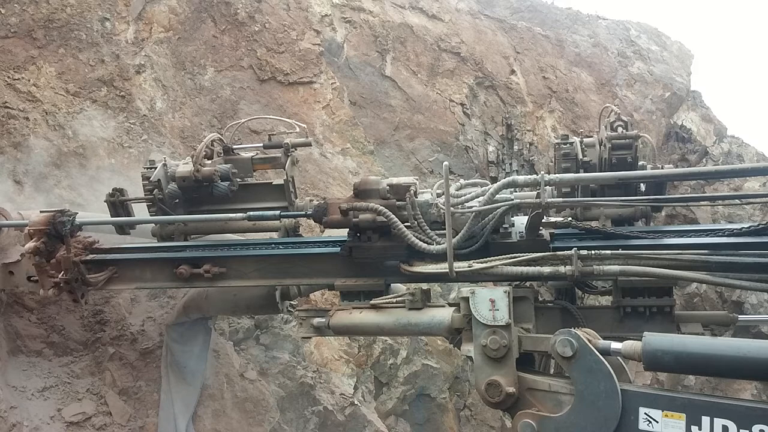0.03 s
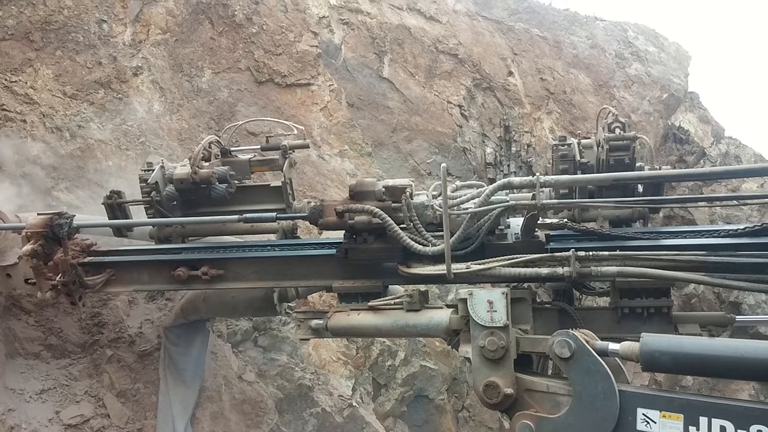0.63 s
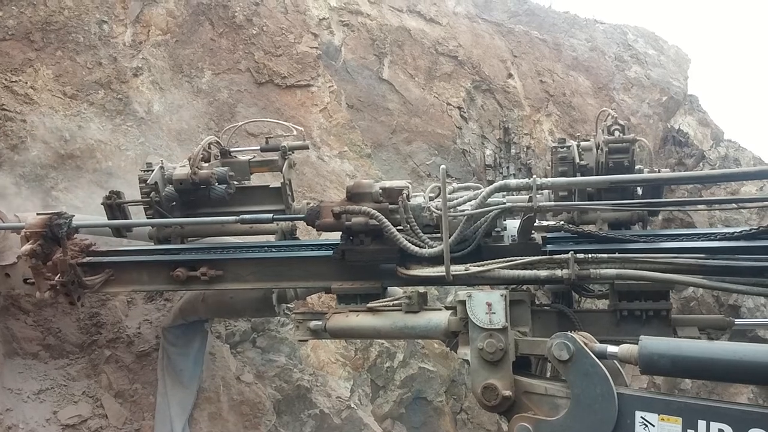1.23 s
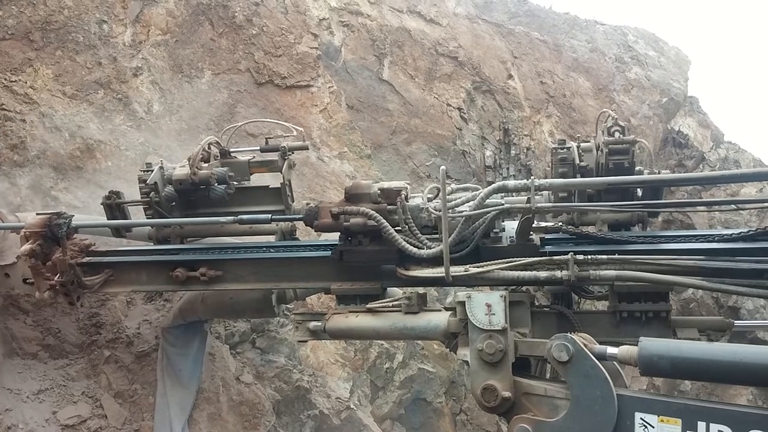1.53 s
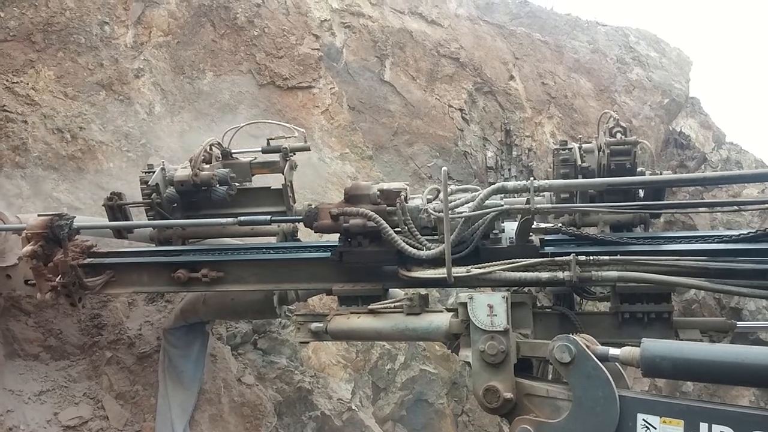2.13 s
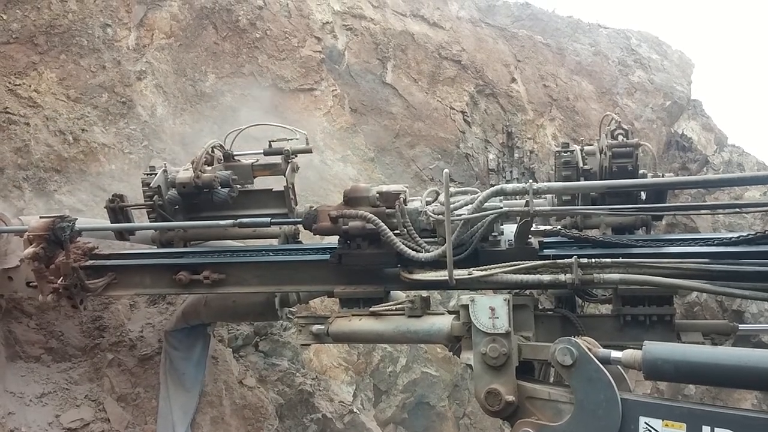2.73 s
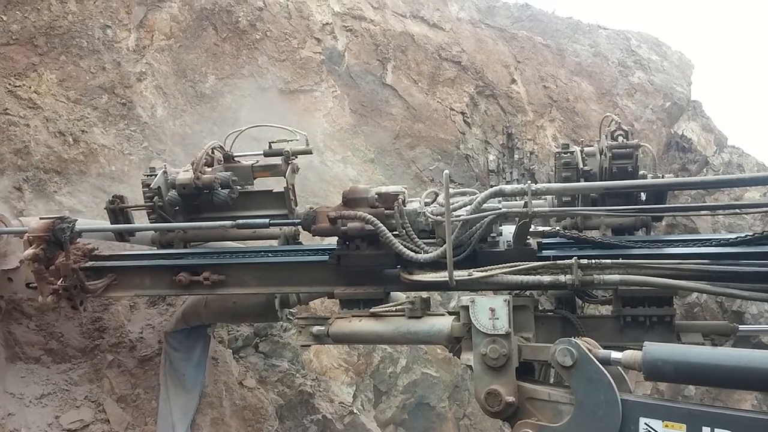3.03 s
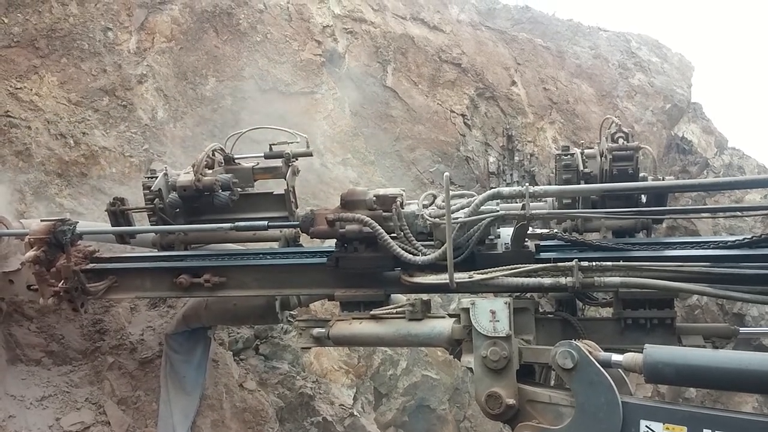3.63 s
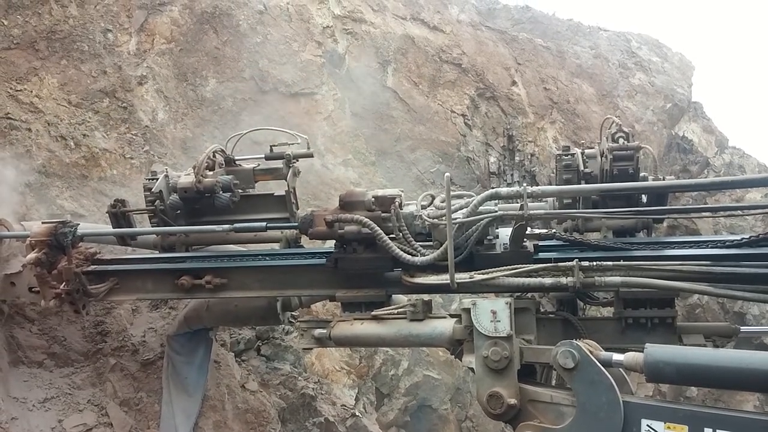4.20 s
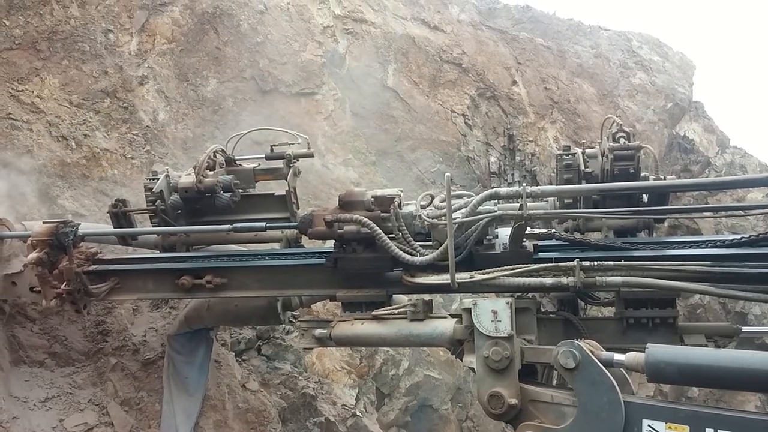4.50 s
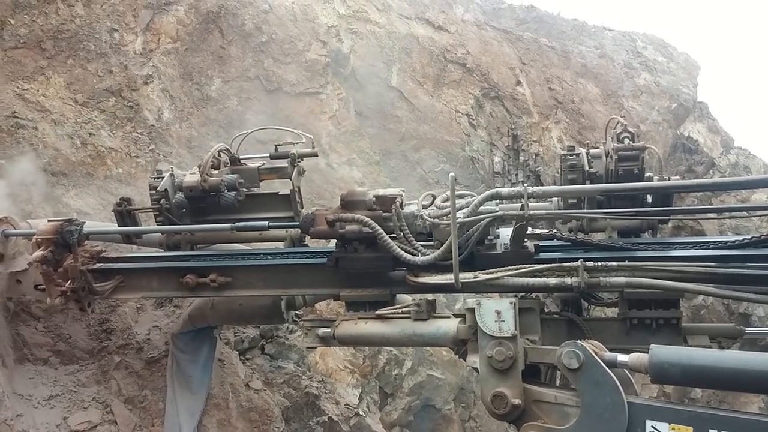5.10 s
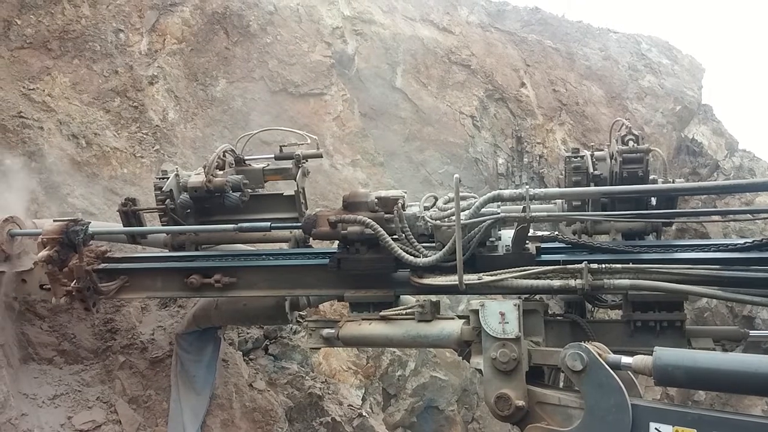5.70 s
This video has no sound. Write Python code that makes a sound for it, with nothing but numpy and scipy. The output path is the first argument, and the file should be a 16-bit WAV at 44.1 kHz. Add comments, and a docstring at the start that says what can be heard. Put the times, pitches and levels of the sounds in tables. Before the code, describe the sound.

A rock drilling rig starts suddenly with harsh, ringing grinding and a loud rush of air, heard close up outdoors against a rock wall. The grinding soon fades, leaving a metallic rattle, short high squeals and a faint, fast hammer pulse beneath the hiss. Toward the end the air weakens and the rattling steel carries on. Occasional gusts pop on the microphone's right side.

```python
"""At a quarry face, beside the boom of a hydraulic rock drill; the sound cuts in abruptly.
The bit grinds harshly for a second, crushed rock exciting the resonances of the drill steel. The steel then
rattles on more quietly, with brief friction squeals, under a bright jet of flushing air that falls away
near the end. The hammer modulates them all with a faint throb, and gusts pop on the right microphone."""
import sys
import numpy as np
from scipy import signal
from scipy.fft import rfft, irfft, next_fast_len
from scipy.io import wavfile
from scipy.ndimage import uniform_filter1d

SR = 44100
rng = np.random.default_rng(int(sys.argv[2]) if len(sys.argv) > 2 else 0)


def waveform_to_disk(signal):
    """Save audio, clipped to [-1, 1], as 16-bit WAV at the path in sys.argv[1]."""
    frames = np.transpose(np.atleast_2d(signal))
    scaled = np.clip(frames, -1, 1) * 32767
    samples = np.round(scaled).astype(np.int16)
    wavfile.write(sys.argv[1], SR, samples)


N = 253575
START_S = .607

# Resonances of the drill steel and feed beam. Each row: frequency in Hz, width in Hz, relative lift in dB.
ROD_RESONANCES = [(1332, 219, 5.5), (1704, 103, 6.5), (2019, 24, 5.7), (2230, 116, 6.1), (2475, 105, 5.3),
                  (2750, 53, 6.9), (2962, 49, 9.9), (3383, 53, 6.2), (3676, 31, 5.1), (4557, 150, 4.9),
                  (4739, 66, 8.3), (5040, 41, 7.3), (6236, 23, 5.7), (7292, 255, 9.9)]


def gain_of(db):
    """Amplitude ratio of a level in decibels."""
    return 10 ** (np.asarray(db) / 20)


def unit_rms(x):
    """Normalisation to an rms of 1."""
    return x / np.sqrt(np.mean(x ** 2) + 1e-20)


def interpolate(rows, hz):
    """Interpolation of each column of a spectrum table along a log-frequency axis."""
    row_hz, *columns = np.transpose(rows)
    return np.array([np.interp(np.log(hz + 1), np.log(row_hz + 1), column) for column in columns])


def wander(top_hz):
    """Low-pass noise: a random fluctuation of rms 1, up to about top_hz."""
    hz = np.fft.rfftfreq(N, 1 / SR)
    return unit_rms(irfft(rfft(rng.standard_normal(N)) * (hz > 1) / (1 + (hz / top_hz) ** 2), N))


def radiate(force, colour, modes, lift_scale, right_share, left_lead_s=0.000582):
    """Resonant filtering of a random force, partly coherent at two microphones; the left hears it first."""
    # Likeness of the two microphone signals. Each row: frequency in Hz, coherence from 0 to 1.
    likeness = [(100, 0), (600, 0.2), (1000, 0.3), (1600, 0.32), (2100, 0.16), (3000, 0.15), (4500, 0),
                (15000, 0.38)]
    size = next_fast_len(N + 8192)
    hz = np.fft.rfftfreq(size, 1 / SR)
    left, independent = rfft(force * rng.standard_normal((2, N)), size)
    coherence = interpolate(likeness, hz)[0]
    delayed = left * np.exp(-2j * np.pi * hz * left_lead_s)
    right = coherence * delayed + np.sqrt(1 - coherence ** 2) * independent
    lift_db = lift_scale * sum(db / (1 + (2 * (hz - centre) / width) ** 2) for centre, width, db in modes)
    response = gain_of(interpolate(colour, hz) + np.array([lift_db, right_share * lift_db]))
    return unit_rms(irfft(np.array([left, right]) * response, size)[:, :N])


def shifting(x, depth_db):
    """Random spectral modulation: patches of the spectrum swell and fade independently."""
    spectra = signal.stft(x, nperseg=512, noverlap=384)[2]
    patches = uniform_filter1d(rng.standard_normal(spectra.shape[1:]), size=6, axis=0)  # over frequency
    patches = unit_rms(uniform_filter1d(patches, size=18, axis=1))  # over time
    shifted = signal.istft(spectra * gain_of(depth_db * patches), nperseg=512, noverlap=384)[1]
    return unit_rms(shifted[:, :N])


def hammer(rate_hz=39.77, decay_s=0.0033, return_share=0.28):
    """Periodic impact: the piston strikes once a cycle and knocks on its return, each a decaying surge."""
    cycles = rate_hz * np.arange(N) / SR
    blow, rebound = (np.exp(-((cycles + lag) % 1) / (rate_hz * decay_s)) for lag in (0, .5))
    return blow + return_share * rebound


def bit(blows, steady_db=-12, release_s=1.532, fade_db_per_s=84, throb=.2, flutter_db=0.47):
    """Forced vibration: rock crushed under the bit shakes the loaded steel until the bit loses its grip."""
    # Spectrum of the grinding. Each row: frequency in Hz, left and right relative levels in dB.
    colour = [(30, -11, -7), (150, -12.5, -11.5), (400, -9, -10), (900, -7, -7.5), (1330, -3.5, -4),
              (2400, -0.5, -7), (3900, -1, -6), (4500, -1, -9), (6260, 1.5, -5.5), (7400, -29, -13),
              (8300, -24, -11), (10300, -19, -22), (12500, -24, -26), (15500, -23, -26)]
    # Resonances of the loaded steel. Each row: frequency in Hz, width in Hz, relative lift in dB.
    modes = [(1317, 101, 4.6), (1689, 37, 4.8), (2004, 51, 6.0), (2200, 34, 6.4), (2474, 39, 9.4),
             (3196, 36, 4.4), (3685, 27, 4.4), (4528, 176, 8.8), (4744, 52, 5.1), (5046, 41, 5.3),
             (5725, 50, 4.5), (5981, 99, 4.7), (6560, 71, 12.8)]
    level_db = steady_db - fade_db_per_s * np.maximum(np.arange(N) / SR - release_s, 0)
    force = (1 + throb * blows) * gain_of(flutter_db * wander(top_hz=19))
    return gain_of(level_db) * radiate(force, colour, modes, lift_scale=1.12, right_share=0.48)


def rod_db(t, light_db=-22, hard_db=-19, middle_s=3.43, ramp_s=.35):
    """Level envelope of the drill steel: a light rattle, then a short ramp to a harder one."""
    hardness = np.clip(.5 + (t - middle_s) / ramp_s, 0, 1)
    return light_db + (hard_db - light_db) * hardness


def rod(blows, throb=0.6, flutter_db=0.5):
    """Friction noise: the turning steel scrapes unevenly in its guides and jumps with each blow."""
    # Spectrum of the rattle. Each row: frequency in Hz, left and right relative levels in dB.
    colour = [(30, -9, -3.5), (147, -6, -8.5), (394, -7.5, -9.5), (980, -2, -5), (1450, -4.5, -9.5),
              (2390, -2, -10), (3880, -1, -9), (4500, 0.5, -9.5), (6320, 2, -9), (7330, -7.5, -30),
              (8300, -9, -29), (10300, -18, -43), (12500, -22, -26), (15500, -16, -26)]
    force = (1 + throb * blows) * gain_of(flutter_db * wander(top_hz=15))
    rattle = radiate(force, colour, ROD_RESONANCES, lift_scale=.92, right_share=0.9)
    rattle = shifting(rattle, depth_db=1.0)  # the contact point moves
    return gain_of(rod_db(np.arange(N) / SR)) * rattle


def flushing_air(blows, full_db=-14, weak_db=-26.5, throttle_s=4.5, bleed_s=.085, throb=0.14):
    """Jet noise: dusty air, chopped by the hammer, weakens as the throttled hose loses its pressure."""
    # Spectrum of the jet. Each row: frequency in Hz, left and right relative levels in dB.
    colour = [(30, -22, -11), (150, -40, -10.5), (393, -14, -11.5), (925, -15.5, -7), (1320, -10.5, -5.5),
              (2260, -7, -8), (3700, -15, -7), (4340, -9, -5.5), (6400, -3, -6.5), (7740, -0.5, -1.5),
              (8320, -7, -4), (10300, -13.5, -6.5), (12700, -18, -4.5), (16300, -10, -8.5)]
    # Bright peaks of the hiss. Each row: frequency in Hz, width in Hz, lift in dB.
    peaks = [(5900, 87, 5.5), (6070, 60, 6.5), (6550, 220, 4.5), (7300, 164, 4), (9400, 670, 5),
             (11340, 280, 5.5)]
    pressure = np.exp(-np.maximum(np.arange(N) / SR - throttle_s, 0) / bleed_s)
    flutter_db = 0.09 * wander(top_hz=16)
    grit_db = -0.4 * wander(top_hz=700)
    force = (1 + throb * blows) * gain_of(flutter_db + grit_db)
    hiss = shifting(radiate(force, colour, peaks, lift_scale=1, right_share=1), depth_db=1.07)
    return (pressure * gain_of(full_db) + (1 - pressure) * gain_of(weak_db)) * hiss


def rock_face(x, echo_db=-26, count=10):
    """Comb filtering: early reflections from rock and boom ripple each microphone's spectrum differently."""
    out = x.copy()
    for channel in range(2):
        for delay in rng.integers(SR // 300, SR // 40, count):
            out[channel, delay:] += gain_of(echo_db) * x[channel, :-delay]
    return out


def faint_rubs(count=44, length_s=.17, under_db=-16, spread_db=5, detune=.006):
    """Random excitation of single modes: rows for squeals(), their levels following the rod's."""
    when, which, size, pitch = rng.random((count, 4)).T
    middle_s = START_S + when * (N / SR - START_S)
    mode_hz = np.array(ROD_RESONANCES)[(which * len(ROD_RESONANCES)).astype(int), 0]
    hz = mode_hz * (1 + detune * (2 * pitch - 1))
    level_db = rod_db(middle_s) + under_db + spread_db * size
    return list(zip(middle_s, length_s * (.5 + size), hz, level_db))


def squeals(blows, level_db=-2.0, waver_hz=7, shake=0.31, slip_rad=0.76, throb=.4, right_db=-11):
    """Friction-driven oscillation: a rub feeds one mode of the steel, which wavers, jolted by the blows."""
    # Strong rubs. Each row: middle and half-height length in seconds, pitch in Hz, relative level in dB.
    strong_rubs = [(0.95, 0.28, 4530, -24), (1.22, 0.12, 4519, -22), (1.68, 0.14, 4536, -24),
                   (2.07, 0.22, 2496, -24.5), (3.68, 0.3, 2959, -32), (3.72, 0.25, 4760, -30),
                   (4.8, 0.24, 5048, -25), (4.87, 0.25, 1700, -27), (4.95, 0.4, 4745, -27),
                   (5.22, 0.14, 2955, -30), (5.65, 0.2, 3382, -29)]
    t = np.arange(N) / SR
    strength = (1 + shake * wander(top_hz=25)) * (1 + throb * blows)
    phase = slip_rad * wander(top_hz=40) + 2 * np.pi * np.cumsum(waver_hz * wander(top_hz=9.1)) / SR
    out = np.zeros(N)
    for middle_s, length_s, hz, db in strong_rubs + faint_rubs():
        near = abs(t - middle_s) < length_s
        swell = np.cos(np.pi / 2 * (t[near] - middle_s) / length_s) ** 2
        tone = np.sin(2 * np.pi * hz * t[near] + phase[near])
        out[near] += gain_of(db + level_db) * swell * strength[near] * tone
    return np.array([out, gain_of(right_db) * out])


def wind(blows, pop_s=0.0016, small_per_s=65, small_db=-29.5, spread_db=3, cutoff_hz=520, in_step=.8):
    """Turbulent pressure pulses: each eddy sucks briefly at the right microphone port and rebounds."""
    # Strong gusts. Each row: time in seconds, peak level in dB.
    gusts = [(0.889, -11.5), (0.958, -9), (1.107, -9), (1.85, -14), (2.515, -16), (2.793, -15), (2.84, -16),
             (3.546, -14.5), (4.98, -11), (5.024, -12), (5.377, -11.5)]
    # Small eddies mostly come with the hammer's blows.
    chance = small_per_s / SR * (1 - in_step + in_step * blows / blows.mean())
    sizes = gain_of(small_db + spread_db * np.minimum(rng.exponential(1, N), 3))
    kicks = sizes * (rng.random(N) < chance)
    for time_s, db in gusts:
        kicks[round(time_s * SR)] += gain_of(db)
    age = np.arange(SR // 20) / SR / pop_s
    low_pass = signal.butter(2, cutoff_hz, fs=SR, output="sos")
    pulse = signal.sosfilt(low_pass, (age - 1) * np.exp(-age))
    pulse /= abs(pulse).max()
    pops = signal.oaconvolve(kicks, pulse)[np.argmin(pulse):][:N]  # deepest suction falls on the kick
    return np.array([np.zeros(N), pops])


def scene():
    """Superposition: one hammer modulates bit, rod and air; squeals and wind join without reflections."""
    blows = hammer()
    drill = bit(blows) + rod(blows) + flushing_air(blows)
    return rock_face(drill) + squeals(blows) + wind(blows)


def record(dry, ceiling=.7, cutoff_hz=15740):
    """Saturation and band limiting: the sound cuts in, and the overloaded input rounds off its peaks."""
    gated = dry * (np.arange(N) / SR >= START_S)
    rounded = gated / (1 + (gated / ceiling) ** 4) ** (1 / 4)
    low_pass = signal.firwin(1023, cutoff_hz, window=("kaiser", 9), fs=SR)
    return signal.oaconvolve(rounded, low_pass[None], "same", axes=1)


dry = scene()
out = record(dry)
waveform_to_disk(out)
```